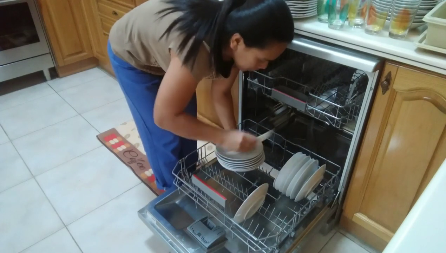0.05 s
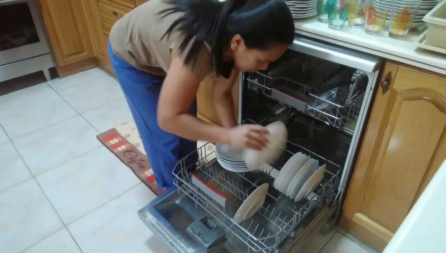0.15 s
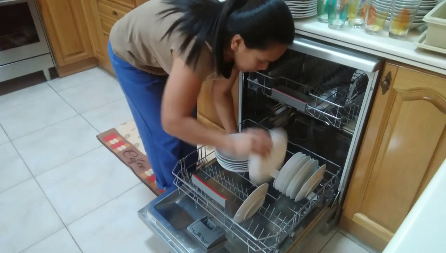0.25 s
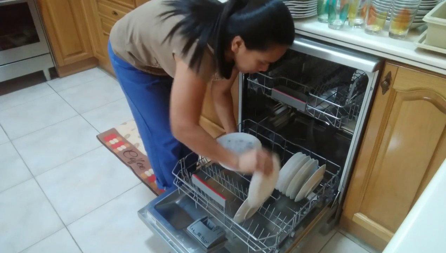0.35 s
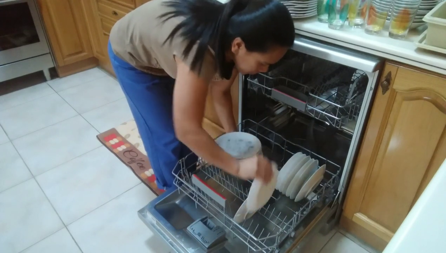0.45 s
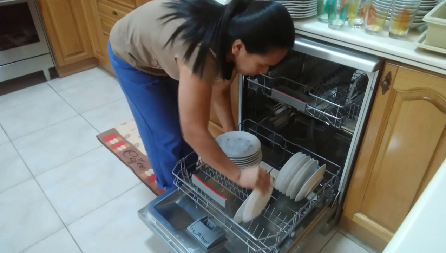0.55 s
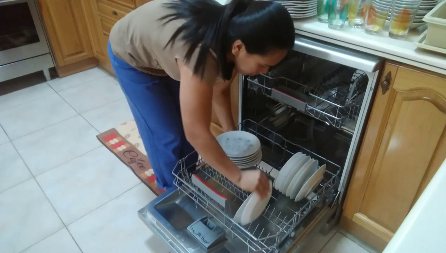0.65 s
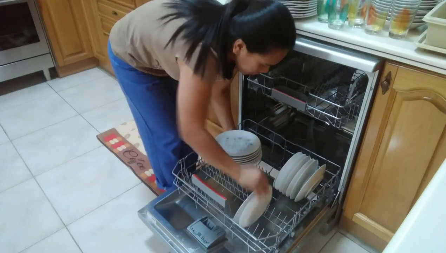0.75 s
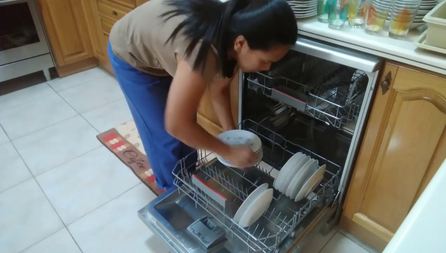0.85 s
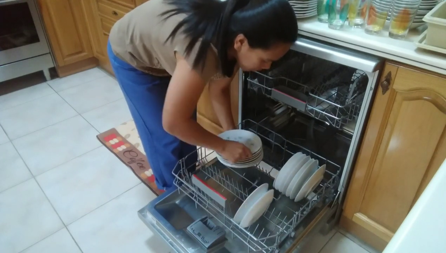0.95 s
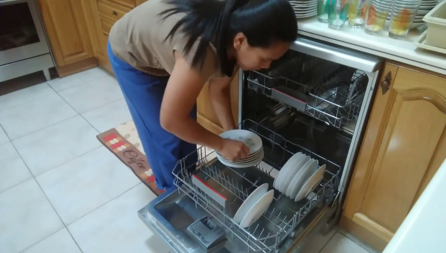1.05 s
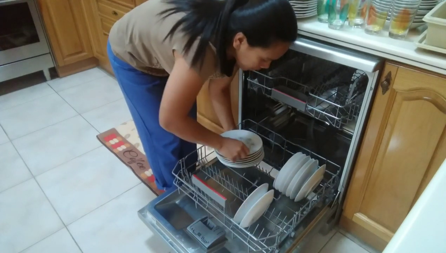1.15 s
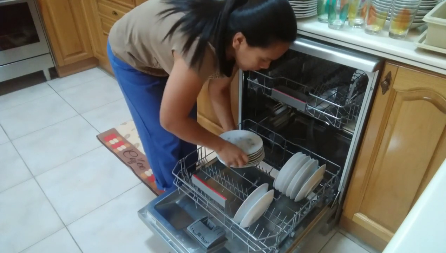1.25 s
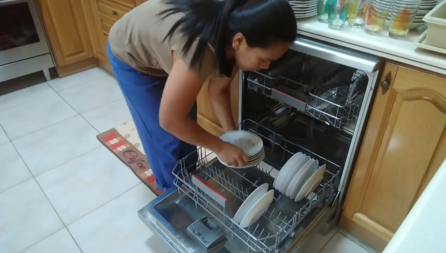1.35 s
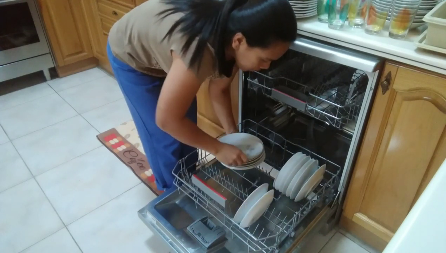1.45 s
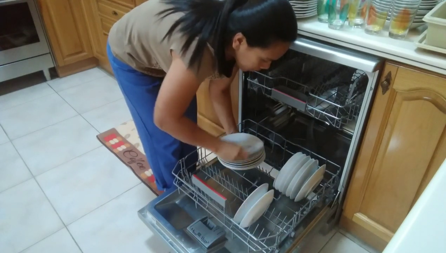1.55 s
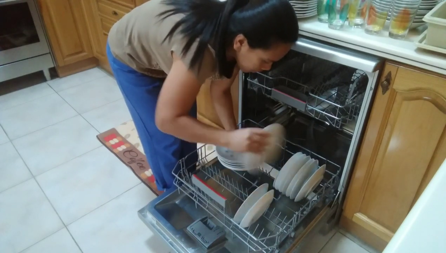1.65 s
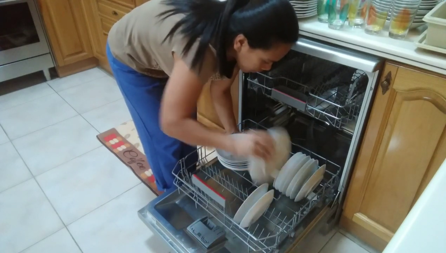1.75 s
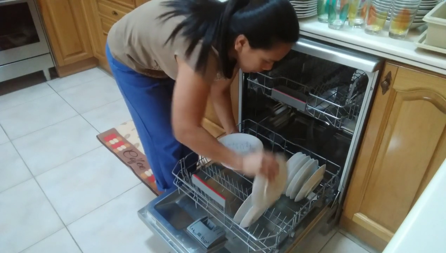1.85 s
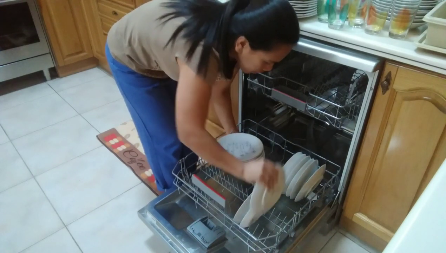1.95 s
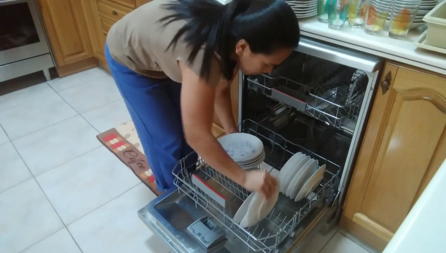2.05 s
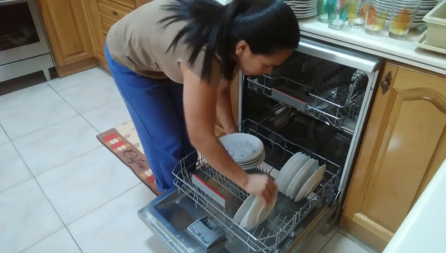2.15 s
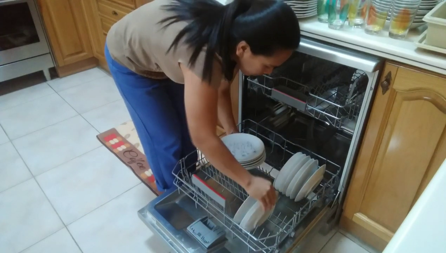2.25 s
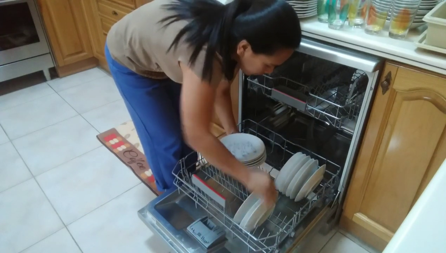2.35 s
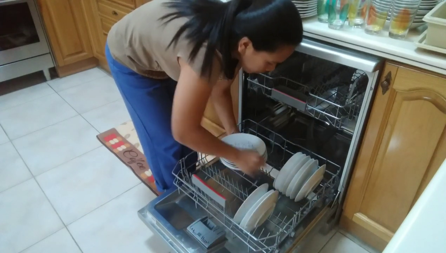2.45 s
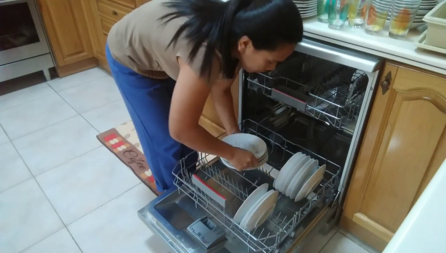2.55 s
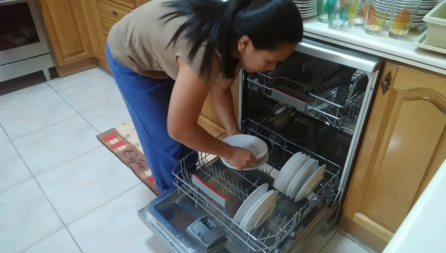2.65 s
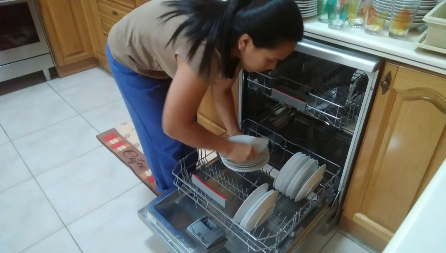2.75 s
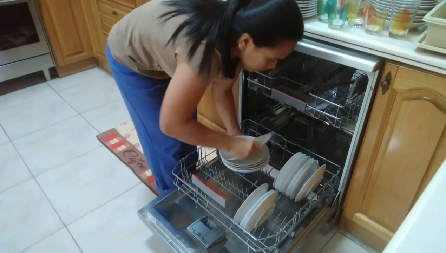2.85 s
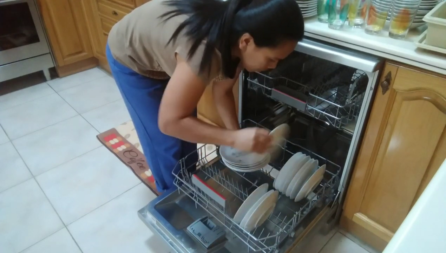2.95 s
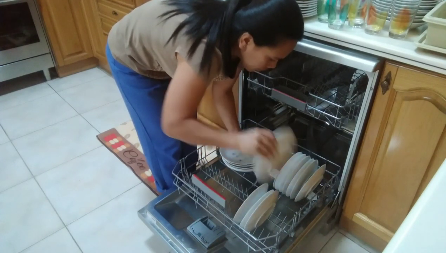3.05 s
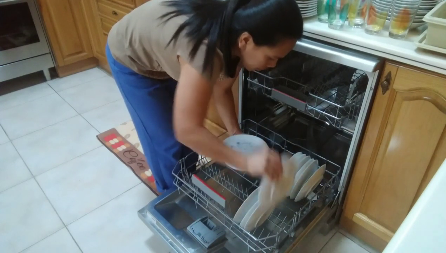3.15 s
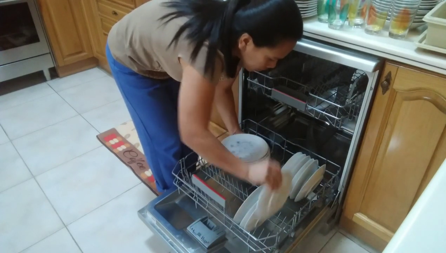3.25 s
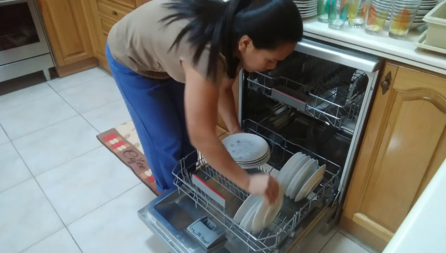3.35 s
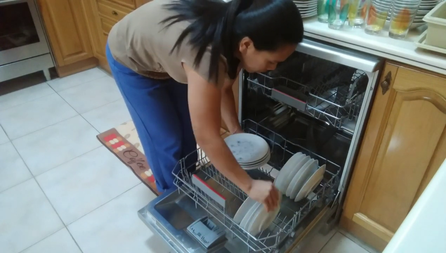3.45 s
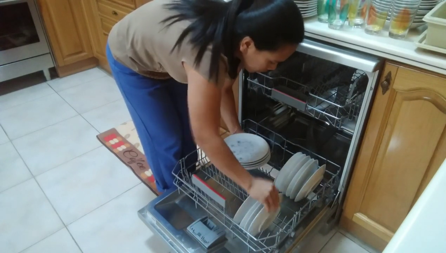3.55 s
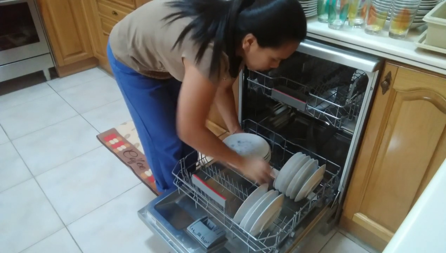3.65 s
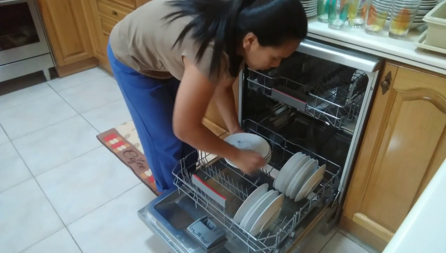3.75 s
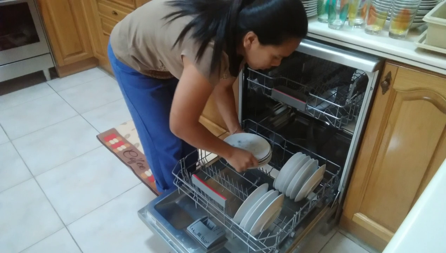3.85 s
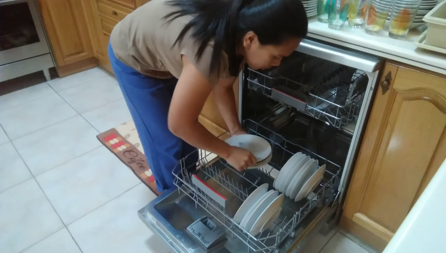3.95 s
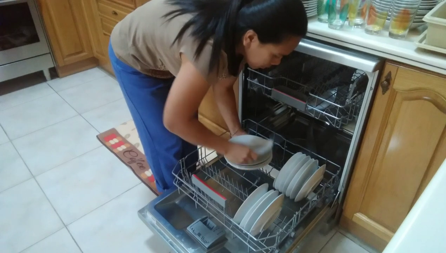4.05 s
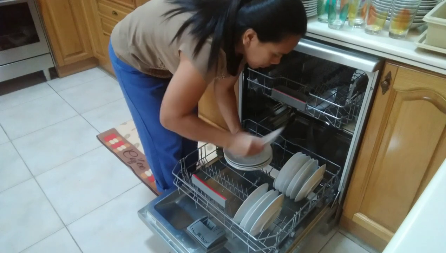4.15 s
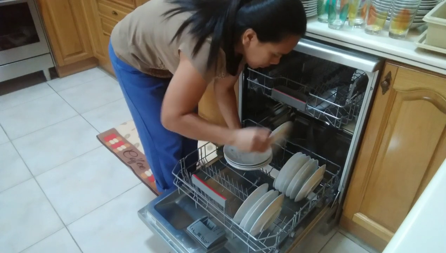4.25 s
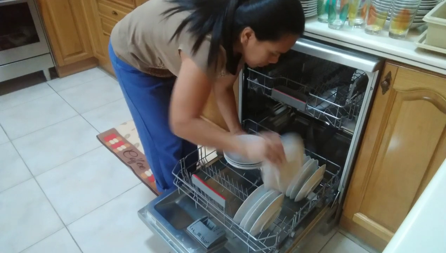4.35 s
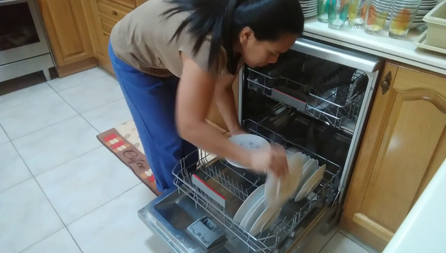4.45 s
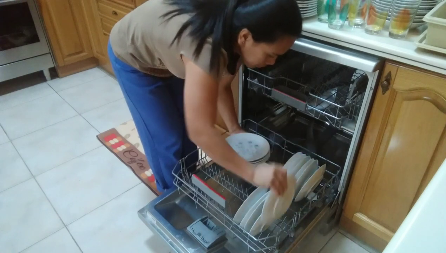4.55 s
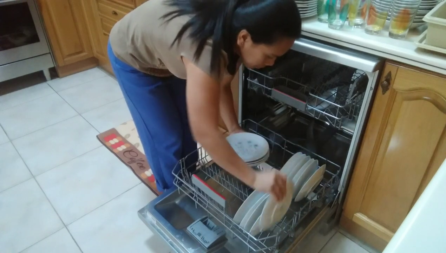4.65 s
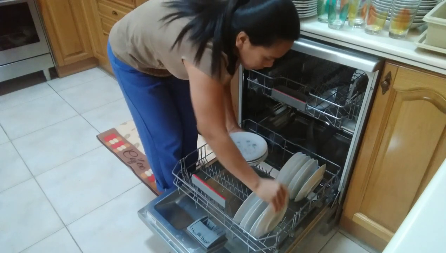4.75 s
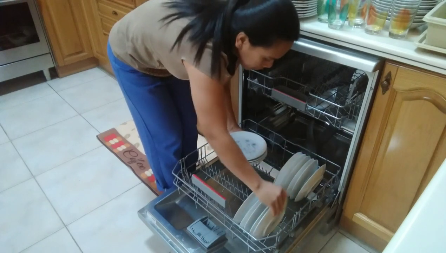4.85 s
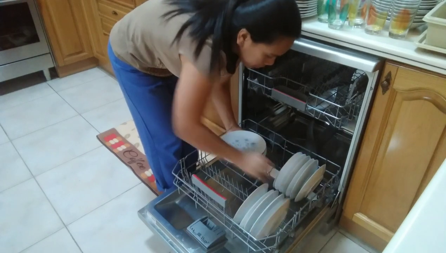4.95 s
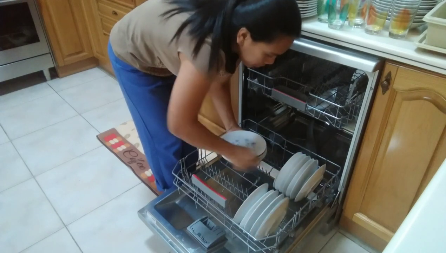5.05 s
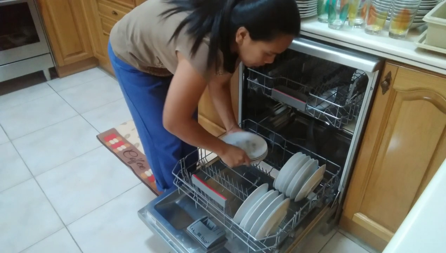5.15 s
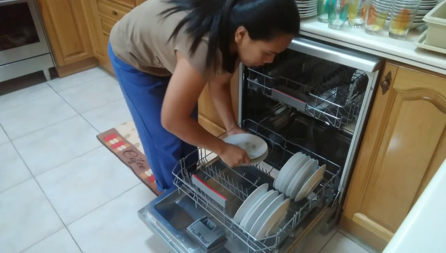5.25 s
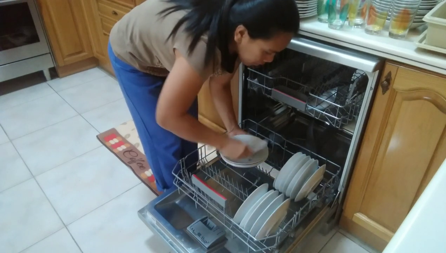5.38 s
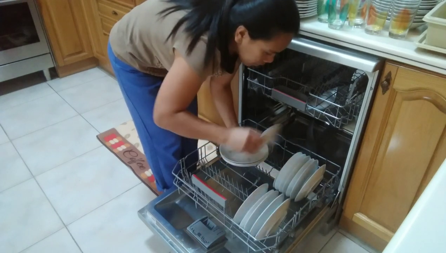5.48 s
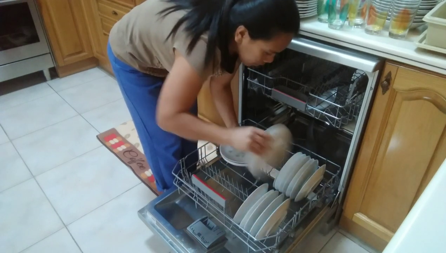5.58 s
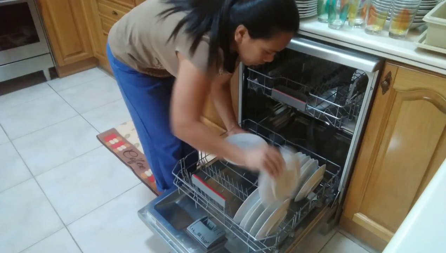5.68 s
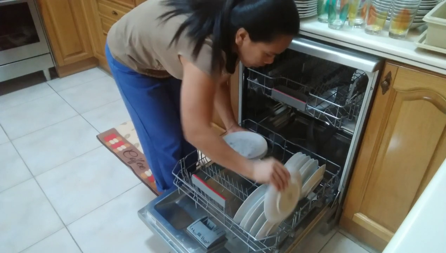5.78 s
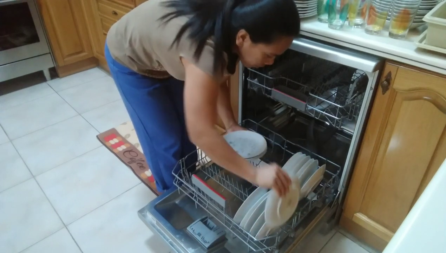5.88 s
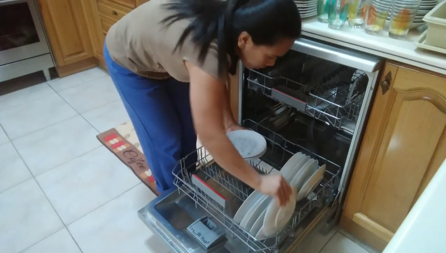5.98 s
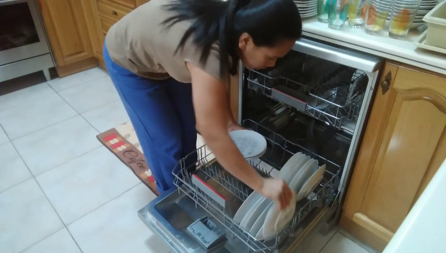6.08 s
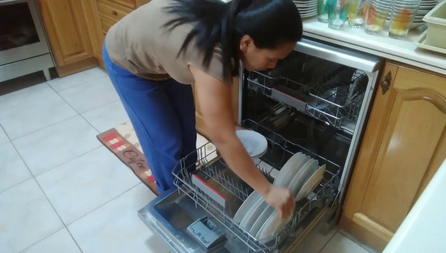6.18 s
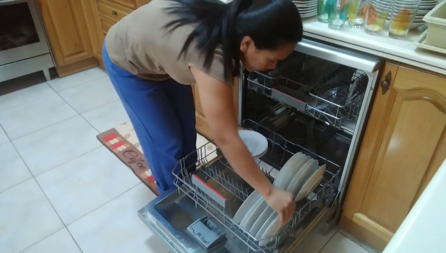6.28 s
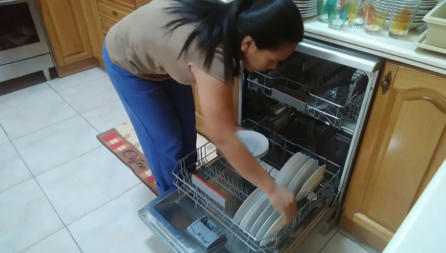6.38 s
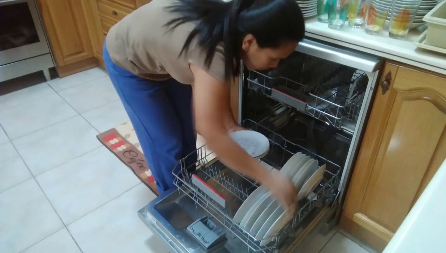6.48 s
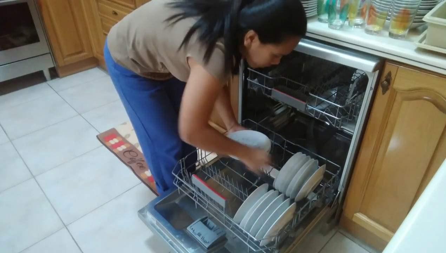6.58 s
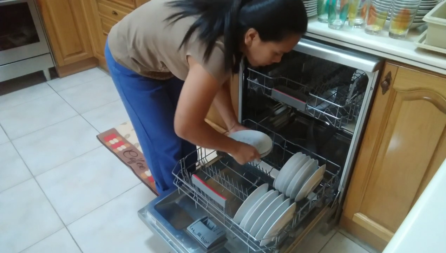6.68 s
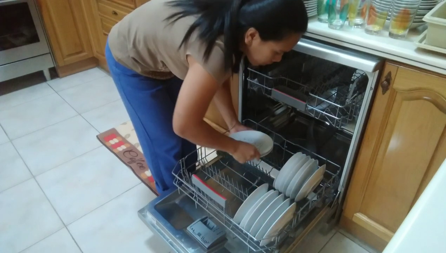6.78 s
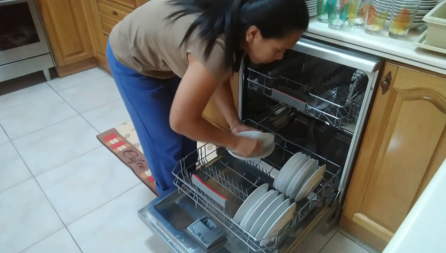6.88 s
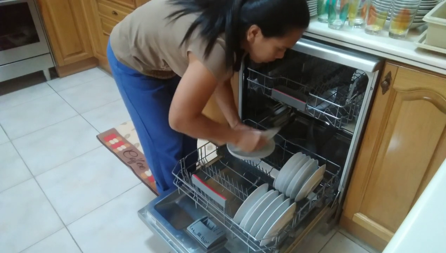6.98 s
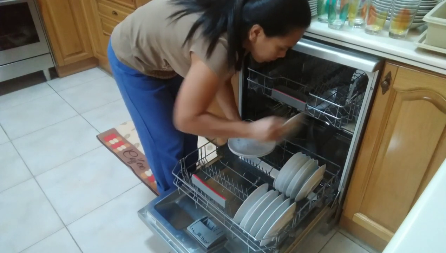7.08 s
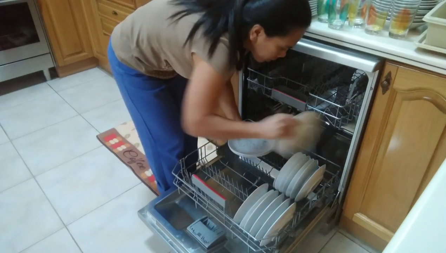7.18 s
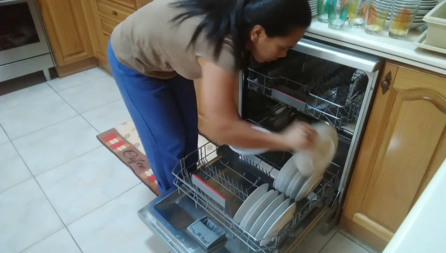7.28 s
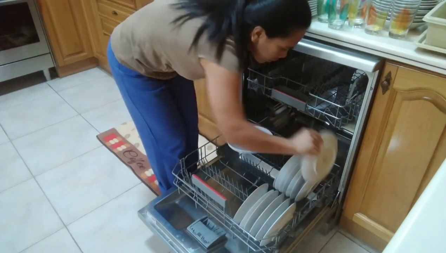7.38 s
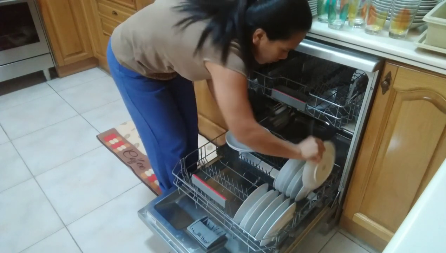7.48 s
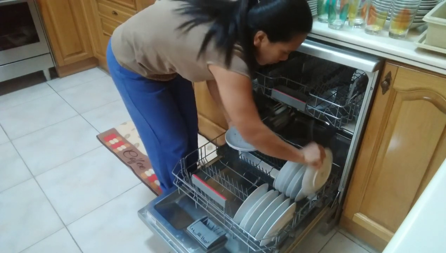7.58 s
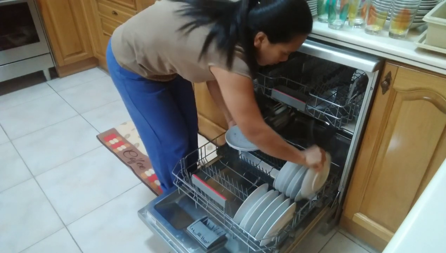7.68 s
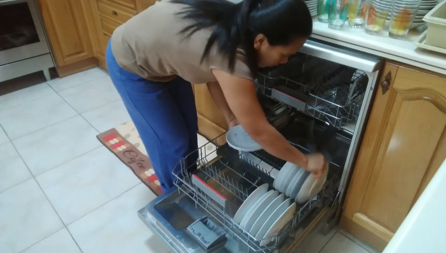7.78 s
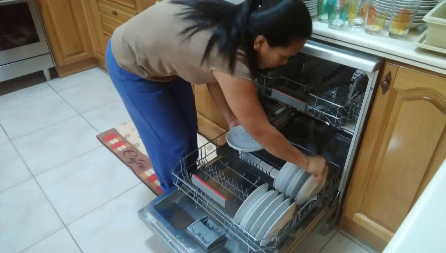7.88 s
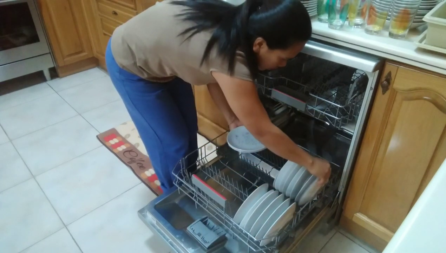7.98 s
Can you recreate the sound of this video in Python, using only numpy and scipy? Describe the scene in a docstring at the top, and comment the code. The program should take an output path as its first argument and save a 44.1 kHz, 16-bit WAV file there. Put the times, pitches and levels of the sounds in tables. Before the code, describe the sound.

Ceramic plates slid from a hand-held stack clack and knock one by one into a dishwasher's wire rack in a hard, tiled kitchen.

```python
"""Ceramic plates, slid off a hand-held stack, clack and knock as they are set into a dishwasher's wire rack.
Blows and grinding excite damped modes of each plate, stack or racked row; noise bursts give the cracks.
The same blows shake rack and door, and a hard tiled kitchen adds a diffuse noise tail to each.
A faint mains hum, a fading low tone and a steady hiss lie beneath. One microphone signal with gain
control feeds both channels, and patches of treble spread flickeringly between them."""
import sys
import numpy as np
from scipy import signal
from scipy.fft import rfft, irfft
from scipy.io import wavfile
from scipy.ndimage import uniform_filter1d

SR = 44100
rng = np.random.default_rng(int(sys.argv[2]) if len(sys.argv) > 2 else 0)


def magnitude_from_level(level_db):
    """Linear magnitude for a level in decibels (20 dB per decade)."""
    exponent = np.asarray(level_db, float) / 20
    return 10 ** exponent


def output_pcm(signal):
    """Save a mono or channel-first signal as 16-bit PCM at the path in sys.argv[1].

    Samples are clipped to [-1, 1] before scaling.
    """
    pcm = np.clip(np.atleast_2d(signal).T, -1, 1) * 32767
    wavfile.write(sys.argv[1], SR, np.round(pcm).astype(np.int16))


N = 353682
LEAD = SR // 2   # samples computed ahead of the audible start
LONG = N + LEAD

# Impacts. Each row: start in seconds, relative ring level in dB, relative rack thud in dB,
# brightness in dB per octave, favoured frequency in Hz.
BLOWS = [(0.2123, -57, -59.5, 0.8, 10100), (0.4753, -35.5, -58.5, 0.5, 2786),
         (0.555, -32.5, -52.5, -2, 6710), (0.6738, -18.5, -42, 0, 3550), (0.7428, -6.5, -27, 1.6, 1590),
         (0.7829, -4.5, -33, 3.5, 9460), (0.9201, -18, -30.5, 0.1, 6710), (1.0179, -29, -43, -2.5, 1620),
         (1.252, -29.5, -43, -4.5, 1064), (1.3113, -7, -62, 3.5, 5300), (1.3793, -15.5, -51, 3.5, 2710),
         (1.4467, -14.5, -60, 3.8, 13400), (1.49, -9.5, -51, 0.5, 11800), (2.1353, -21, -50, 2.5, 3500),
         (2.1647, -6, -35, 1.1, 9460), (2.2618, -4, -24.5, -1.5, 3295), (2.2984, -21.5, -46, -2, 5310),
         (2.59, -44.5, -42, -4.5, 2140), (2.7584, -4.5, -50.5, 3.5, 2044), (3.364, -21, -47.5, 6.5, 3700),
         (3.3843, -12, -35, 3, 5240), (3.4045, -12.5, -51, -0.5, 5300), (3.486, -8.5, -30.5, 4.5, 4430),
         (3.5881, -13, -28.5, 0.8, 6760), (3.853, -23, -65, 1.5, 11600), (3.8883, -17.5, -40, 1, 2090),
         (3.9394, -48, -50.5, -6.5, 2310), (4.0284, -10, -49, 0.5, 3560), (4.6791, -15, -42, -0.7, 1170),
         (4.72, -19.5, -42, -0.1, 3340), (4.8263, -28, -38.5, 0.5, 5170), (4.8881, -16, -29.5, -1, 2210),
         (4.9328, -9.5, -30, 4, 5230), (4.997, -8, -32, 1, 13100), (5.1303, -16, -59.5, 0.5, 5250),
         (5.1871, -11, -37.5, 1.5, 2290), (5.2698, -15, -56, 0.5, 9430), (5.3286, -8.5, -82.5, 0, 10600),
         (5.686, -8.5, -37.5, 1, 7700), (5.6889, -5.5, -39.5, 13.5, 9440), (5.7694, -7.5, -43, 4, 1580),
         (5.7994, -13, -38, 7, 8350), (6.1715, -20.5, -36.5, 12.5, 5250), (6.2294, -22.5, -48.5, 0.5, 2230),
         (6.254, -13, -28.5, 4, 2230), (6.2794, -27.5, -46, -2.5, 2130), (6.758, -13, -56, 2, 2240),
         (6.9016, -11.5, -53, 3.6, 2160), (7.6084, -23.5, -37.5, -1.8, 3590), (7.6342, -15, -31, 7.5, 3600),
         (7.697, -44, -67, -12.5, 3470), (7.7534, -13, -42, 5.5, 4770), (7.8515, -13.5, -36.5, 7, 10200),
         (7.9745, -27.5, -42.5, 0.5, 3630)]
# One impact before the start, of which only the tail is heard. Columns as in BLOWS.
EARLIER_BLOW = (-.17, -8, -50, .5, 1580)
# China grinding on china or wire. Each row: start in seconds, hardest moment in seconds,
# end in seconds, relative level at the hardest moment in dB.
SCRAPES = [(0.745, 0.912, 1.19, -21.5), (1.238, 1.463, 1.76, -21.5), (2.15, 2.324, 3.1, -45),
           (2.607, 2.675, 2.69, -25.5), (3.378, 3.55, 3.7, -27.5), (3.84, 4.035, 4.23, -24.5),
           (4.665, 5.098, 5.4, -32), (5.69, 5.72, 8.3, -49.5), (6.17, 6.205, 6.23, -33),
           (6.728, 6.72, 6.8, -31.5), (7.607, 7.638, 7.95, -42)]
# Modes of each plate, shorter stack or racked row. Each row: frequency in Hz,
# bandwidth in Hz before the partners' width factor, relative level in dB.
STACK_OF_8 = [(1580, 12, -2.5), (2310, 230, -7.5), (2720, 24, 3.5), (3590, 96, -6.5), (4400, 78, -22),
              (5450, 98, -14), (6500, 42, -20), (8430, 63, 0), (10100, 60, -22), (10700, 230, -2),
              (11600, 54, -5.5), (13100, 35, -15)]
PLATE_1 = [(1594, 9, 0.5), (2184, 33, -20.5), (2786, 49, -9), (3550, 100, -8), (4350, 70, -4.5),
           (5336, 53, -3.5), (6710, 73, -5), (7770, 190, -17), (8290, 57, -10.5), (9460, 19, -6),
           (10490, 33, -5.5), (10200, 51, -20), (10400, 22, -20.5), (11200, 29, -20), (12440, 24, -2),
           (11550, 40, -7), (13100, 20, -8), (14260, 51, -13), (15300, 33, -17)]
STACK_OF_7 = [(1100, 7.6, 3), (1270, 26, 0), (2210, 690, -2), (2710, 23, 5), (3845, 11.8, 12.5),
              (5250, 29, -0.5), (6050, 130, -6), (7940, 28, 6.5), (8660, 31, -6), (8600, 52, 0.5),
              (9770, 22, -26), (10300, 58, 5), (11600, 20, -1.5), (11800, 33, -1), (12400, 83, -3.5),
              (13100, 51, -9), (13400, 39, 0), (14050, 50.3, -22), (14550, 36, -17), (15340, 99, -3)]
PLATE_2 = [(1200, 15.7, -6.5), (2290, 13, 1.5), (2886, 9.9, 0.5), (3565, 123, -0.5), (4290, 63, -3.5),
           (5040, 34, -1), (5250, 100, -3), (6710, 92, -6), (7860, 16, 1.5), (8770, 16, 0), (9440, 18, -16),
           (9900, 33, -10.5), (9700, 150, -9.5), (10600, 27, 2.5), (11000, 25, -13), (11680, 33, -5.5),
           (11600, 55, -12), (12130, 27, -0.5), (13000, 120, -8), (13600, 23, -15.5), (14600, 79, -11),
           (15000, 34, -18.5)]
STACK_OF_6 = [(2186, 42, 1.5), (2490, 7.1, 4.5), (3410, 9, 7), (3870, 33, 2), (5120, 49, -5),
              (5440, 27, -2.5), (6750, 88, -10), (7870, 30, -2), (8760, 31, -19), (8480, 17, -0.5),
              (9180, 24, -18), (9750, 75, -29), (10200, 31, -6), (10600, 30, -13), (11270, 22, 1),
              (11700, 24, -14), (11800, 44, -14), (13450, 16, 0), (12760, 63, -10.5), (14100, 39, -12)]
PLATE_3 = [(1182, 23, -3), (2526, 58, 4), (3680, 220, -2.5), (4220, 34, -5.5), (4430, 72, -4.5),
           (5330, 80, 1.5), (6570, 66, -7.5), (6760, 36, -7), (7700, 84, -5), (8300, 65, -5.5),
           (8800, 41, -12), (8870, 53, -11), (10600, 490, -7.5), (11600, 34, -1), (12200, 47, -12.5),
           (12240, 44, -3.5), (12600, 52, -9), (13740, 140, -23), (14600, 21, -15.5), (14100, 56, -11.5),
           (14960, 45, -16), (15300, 35, -18)]
STACK_OF_5 = [(1169, 14, 2.5), (2097, 30, 2.5), (2290, 46, 4), (3560, 46, -3), (3950, 7.3, 9),
              (5240, 38, 5.5), (5300, 19, -20), (5900, 230, -5), (7690, 31, 4), (8100, 59, -14),
              (8350, 99, -23.5), (8550, 120, 0.5), (9430, 38, -1), (10570, 65, 4.5), (11600, 37, 6),
              (11600, 38, -1.5), (13700, 48, -0.5), (13000, 42, 8.5), (14100, 89, -10), (15300, 37, -11)]
PLATE_4 = [(1225, 51, -1.5), (2210, 39, -9.5), (3340, 40, -3), (3580, 96, 1.5), (5230, 120, -6),
           (6320, 29, -3), (4770, 22, 0), (7730, 25, 2), (8820, 56, -6), (9960, 52, 0), (10470, 130, -2.5),
           (10800, 35, -18), (11900, 39, -12), (11500, 39, -9), (12800, 38, -5), (13100, 27, -9),
           (13470, 170, -20), (14180, 31, -14), (14650, 47, -18.5), (15550, 110, -19)]
STACK_OF_4 = [(1054, 100, -8), (1750, 35, 0.5), (2250, 25.5, 3), (3710, 80, 3.5), (4000, 32, -15),
              (5250, 56, 0.5), (6450, 13, 6.5), (8020, 82, -6), (8680, 25, 11), (9430, 40, -9),
              (10600, 44, -9), (10600, 60, -5), (11600, 59, -11), (11600, 61, 3.5), (11800, 68, -9),
              (12700, 140, -0.5), (13700, 110, -6.5), (13800, 83, -5), (14640, 72, -20), (15400, 45, -8)]
PLATE_5 = [(1567, 6.2, -1.5), (2163, 75, -2), (2600, 53, -11), (3380, 24, 0), (3590, 34, 5.5),
           (4770, 50, -5), (5400, 62, -9.5), (6270, 52, -6), (6620, 79, -13), (7400, 32, -14.5),
           (7700, 33, -16.5), (8430, 76, -10), (9440, 9.7, -6), (10200, 53, -6.5), (11360, 22, -9.5),
           (11330, 50, -13.5), (12150, 23, -8), (13000, 47, -17), (13400, 47, -14.5), (13400, 12, -16),
           (14800, 26, -23.5)]
RACKED_ROW = [(1110, 68, -2), (2240, 18, -2), (2760, 42, -7.5), (3440, 21, 2.5), (3550, 49, 4.5),
              (4480, 100, -11.5), (5200, 140, -9.5), (6130, 72, -21), (7750, 86, -15), (8450, 33, -14.5),
              (9900, 27, -20), (10200, 43, -13), (10200, 19, -15), (11600, 63, -18)]
STACK_OF_3 = [(794, 38, 3.5), (2057, 96, 2.5), (3710, 71, 0), (5040, 38, -4), (5310, 18, -12.5),
              (5850, 150, -5.5), (5980, 30, -14), (7700, 37, -7.5), (8560, 69, -7), (8130, 39, -9),
              (9230, 32, -12), (11300, 100, -5.5), (10860, 37, -10), (11600, 28, -0.5), (13300, 27, -8),
              (13200, 25, -1), (13400, 34, -10.5), (14600, 32, -12)]
FAR_ROW = [(1150, 69, -0.5), (3440, 75, 8), (5030, 130, -14), (5040, 51, 0), (6390, 88, 1), (6630, 15, -14),
           (6800, 32, -0.5), (7600, 48, 2.5), (8370, 29, -20), (9430, 33, -24), (10200, 59, -11.5),
           (11000, 100, -15), (12800, 61, -10.5), (12400, 21, -8), (13800, 180, -12), (14500, 37, -19)]
PLATE_6 = [(1205, 78, 10), (2300, 16.8, 2), (3600, 170, 1.5), (4770, 97, -1), (5260, 18, 7.5),
           (6420, 44, 3.5), (6880, 22, -5.5), (7700, 48, -4.5), (8500, 27, -12), (8360, 47, -7),
           (9430, 74, -9), (10200, 38, -26.5), (10900, 60, -20), (13700, 29, -15.5)]
# What is in hand. Each row: handled from (seconds), modes of the body, whether plates rest on each other.
HANDLED = [(-.3, STACK_OF_8, True), (.42, PLATE_1, False), (1.22, STACK_OF_7, True), (2.1, PLATE_2, False),
           (2.55, STACK_OF_6, True), (3.33, PLATE_3, False), (3.82, STACK_OF_5, True),
           (4.65, PLATE_4, False), (5.175, STACK_OF_4, True), (5.66, PLATE_5, False),
           (6.15, RACKED_ROW, False), (6.57, STACK_OF_3, True), (7.55, PLATE_6, False),
           (7.84, FAR_ROW, False)]
# Partners of each mode; stacked plates differ and damp each other.
# Each row: pitch offset as a share of the frequency, relative level in dB, width factor.
ONE_PLATE = [(0, -1, 0.81), (.005, -11.5, 2.07)]
STACKED = [(-.025, -11.5, 5.1), (0, -8.5, 5.2), (0.021, -14, 3.9), (0.001, -1.5, 0.9)]
# Modes of wire rack and door. Each row: frequency in Hz, bandwidth in Hz, relative level in dB.
RACK = [(109, 26, 12), (226, 114, 10), (734, 41, -2)]
# Spectrum of the unpitched part of a contact. Each row: frequency in Hz, relative density in dB per Hz.
CRACK = [(180, -24.5), (300, -23.5), (1040, 5.5), (1870, -1.5), (2100, 7), (4750, -7), (6620, 0),
         (7320, -14), (10600, -3.5), (16000, -23.5)]
# Mains lines. Each row: frequency in Hz, relative rms level in dB.
HUM = [(199.2, -62.5), (296.1, -69), (398.4, -61.5), (899.0, -66)]
# A low tone that dies away. Each row: time in seconds, relative rms level in dB.
DRONE = [(0, -59), (3.1, -57), (3.598, -64.5), (7.999, -70)]
# Spectrum of the hiss. Each row: frequency in Hz, relative density in dB per Hz.
AIR = [(24, -68), (45, -46.5), (95, -30.5), (147, -16), (189, -1), (337, -3.5), (402, -3), (570, -2.5),
       (1210, -4), (1900, -10), (2050, -9.5), (5870, -22.5), (11800, -20), (16000, -25)]
# Reverberation. Each row: frequency in Hz, time to fall 60 dB in seconds.
KITCHEN = [(150, 0.73), (500, 0.67), (2000, 0.71), (5000, 0.63), (10000, 0.41), (16000, 0.28)]
# Treble that spreads. Each row: frequency in Hz, share of the time from 0 to 1.
WIDE_SHARE = [(4100, .35), (5700, .4), (7500, .55), (9600, .45), (11000, .35), (13500, .8), (16000, .45)]

DRONE_HZ, AIR_DB = 268, -55
ROOM_DB = 5.5   # energy of the kitchen's impulse response
CONTACT_S = 0.0029   # time for the force of a contact to reach its peak
# crack beside the ring for a blow of middling strength, and how it falls behind as blows get harder
CRACK_STACKED_DB, CRACK_ONE_PLATE_DB, MIDDLING_BLOW_DB, CRACK_LAG_DB_PER_DB = -5, -16, -13, 0.34
SCRAPE_SWELL_DB, SCRAPE_FADE_DB = 15.5, 35.5
# gain control: threshold, dB of ducking per dB above it, smoothing time, fall of the held level
SQUEEZE_FROM_DB, SQUEEZE, DUCK_SMOOTHING_S, HELD_FALL_DB_PER_S = -11.5, 0.6, 0.0019, 18.5


def rms_one(x):
    """Normalization: scale to a root mean square of 1."""
    return x / np.sqrt(np.mean(x ** 2) + 1e-20)


def at_hz(points, hz):
    """Linear interpolation of a table on a logarithmic frequency axis."""
    table = np.array(points)
    return np.interp(np.log(np.maximum(hz, 1)), np.log(table[:, 0]), table[:, 1])


def coloured(x, spectrum):
    """Minimum-phase filtering: the folded cepstrum gives a causal pulse, here of unit energy."""
    cepstrum = irfft(np.log(magnitude_from_level(at_hz(spectrum, np.fft.rfftfreq(4096, 1 / SR)))))
    cepstrum[1:2048] *= 2
    cepstrum[2049:] = 0
    pulse = irfft(np.exp(rfft(cepstrum)))
    return signal.fftconvolve(x, pulse / np.linalg.norm(pulse))[:len(x)]


def resonance(x, hz, width_hz):
    """Damped resonance: a two-pole filter with gain 1 at its peak, whose bandwidth sets the decay."""
    r = np.exp(-np.pi * max(width_hz, 2) / SR)
    poles = [1, -2 * r * np.cos(2 * np.pi * hz / SR), r * r]
    return signal.lfilter([(1 - r * r) / 2, 0, (r * r - 1) / 2], poles, x + 1e-18)


def ring_energy_db(modes):
    """Additivity of modal energy: what a unit click leaves in a set of modes."""
    return 10 * np.log10(sum(magnitude_from_level(2 * db) * np.pi * width / SR for hz, width, db in modes))


def hum_and_air():
    """Superposition: sines for wavering mains lines and a fading low tone, filtered noise for hiss."""
    s = np.arange(-LEAD, N) / SR
    waver = rms_one(resonance(rng.standard_normal(LONG), 2.0, 5.1))
    hum = sum(magnitude_from_level(db) * np.sin(2 * np.pi * (hz * s + rng.random())) for hz, db in HUM)
    when, drone_db = np.transpose(DRONE)
    hum += magnitude_from_level(np.interp(s, when, drone_db)) * np.sin(2 * np.pi * DRONE_HZ * s)
    hiss = magnitude_from_level(AIR_DB) * coloured(rng.standard_normal(LONG), AIR)
    return np.sqrt(2) * hum * magnitude_from_level(1.7 * waver) + hiss


def contact(at, sizes, size):
    """Finite contact time: the force of each blow swells within a few ms and dies."""
    s = np.arange(SR // 30) / SR / CONTACT_S
    burst = s * np.exp(-s)
    force = np.zeros(size)
    force[at] = sizes
    return signal.fftconvolve(force, burst / np.linalg.norm(burst))[:size]


def china(blows, grind, chatter):
    """Modal excitation: blows and grinding drive the modes of the body in hand, with noise for cracks."""
    out = np.zeros(LONG)
    at = np.round(blows[:, 0] * SR).astype(int) + LEAD
    spread = rng.standard_normal((len(blows), 40))   # every blow lands elsewhere on the rim
    # the contact rolls on, modes catch one by one within 5 ms
    late = (rng.random((len(blows), 40)) * .005 * SR).astype(int)
    starts = [round(row[0] * SR) + LEAD for row in HANDLED] + [LONG]
    crack_db = -CRACK_LAG_DB_PER_DB * (blows[:, 1] - MIDDLING_BLOW_DB)
    for (_, body, stacked), start, end in zip(HANDLED, starts, starts[1:]):
        mine = (at >= start) & (at < end)
        stop = min(end + LEAD, LONG)   # room to ring on
        crack_db[mine] += CRACK_STACKED_DB if stacked else CRACK_ONE_PLATE_DB
        sliding = grind[start:stop] * (np.arange(start, stop) < end)
        ring_db, brightness, favoured_hz = blows[mine][:, [1, 3, 4]].T
        for k, (hz, width_hz, db) in enumerate(body):
            favour_db = 11 * np.exp(-(np.log2(hz / favoured_hz) / 0.063) ** 2)
            tilt_db = brightness * np.log2(hz / 4000)
            blow_db = ring_db + 11 + tilt_db + favour_db + 2.87 * spread[mine, k]
            force = sliding.copy()
            force[at[mine] - start + late[mine, k]] += magnitude_from_level(blow_db)
            for offset, partner_db, wider in STACKED if stacked else ONE_PLATE:
                gain = magnitude_from_level(db + partner_db - ring_energy_db(body))
                out[start:stop] += gain * resonance(force, hz * (1 + offset), width_hz * wider)
    # a brighter blow shifts the crack upward
    for side, kind in ((-1.1, "low"), (0.48, "high")):
        force_db = blows[:, 1] + crack_db + 23.0 + 0.83 * side * blows[:, 3]
        cracks = contact(at, magnitude_from_level(force_db), size=LONG) * chatter
        half = signal.butter(2, 3500, kind, fs=SR, output="sos")
        out += coloured(signal.sosfilt(half, cracks + magnitude_from_level(-2) * grind), CRACK)
    return out


def rack(blows):
    """Forced vibration: the same blows shake the wire rack and the door under it."""
    pushes = np.zeros(LONG)
    at = np.round(blows[:, 0] * SR).astype(int) + LEAD
    pushes[at] = magnitude_from_level(blows[:, 2] + 23 - ring_energy_db(RACK))
    shaking = np.exp(-np.arange(SR // 5) / (0.018 * SR))
    envelope = signal.fftconvolve(pushes, shaking / np.linalg.norm(shaking))[:LONG]
    force = envelope * rng.standard_normal(LONG)
    modes = sum(magnitude_from_level(db) * resonance(force, hz, width_hz) for hz, width_hz, db in RACK)
    return modes + magnitude_from_level(3.0) * resonance(force, 400, 530)


def kitchen(x):
    """Diffuse reverberation: half-octave noise bands, each dying at its own rate after a quick build-up."""
    s, tail = np.arange(SR + LEAD) / SR, 0
    edges = 90 * 2 ** np.arange(0, 7.8, .5)
    white = rng.standard_normal((2, len(s)))   # alternate bands draw on separate noises
    for k, (low, high) in enumerate(zip(edges, edges[1:])):
        band_pass = signal.butter(2, [low, high], "band", fs=SR, output="sos")
        band = signal.sosfilt(band_pass, white[k % 2])
        tail = tail + band * magnitude_from_level(-60 * s / at_hz(KITCHEN, np.sqrt(low * high)))
    tail = tail * (1 - np.exp(-s / 0.00067))
    return signal.fftconvolve(x, magnitude_from_level(ROOM_DB) * tail / np.linalg.norm(tail))[:LONG]


def grinding():
    """Sliding friction: dense uneven clicks while surfaces rub, about 600 per second."""
    s, level = np.arange(-LEAD, N) / SR, np.zeros(LONG)
    for start, hardest, end, db in SCRAPES:
        course_db = [db - SCRAPE_SWELL_DB, db, db - SCRAPE_FADE_DB]
        level += (s >= start) * (s < end) * magnitude_from_level(np.interp(s, [start, hardest, end], course_db))
    click_size = magnitude_from_level(6.3 * np.minimum(rng.exponential(1, LONG), 3))
    grit = (rng.random(LONG) < 600 / SR) * click_size * rng.choice([-1, 1], LONG)
    return magnitude_from_level(-15.0) * level * rms_one(grit)


def flickering_width(x, level_db):
    """Decorrelation: random-phase noise at each treble band's unpitched level comes and goes in patches."""
    hz, s, cells = signal.stft(x, SR, nperseg=1024)
    side, edges = np.zeros_like(cells), np.geomspace(4100, 16500, 15)
    for low, high in zip(edges, edges[1:]):
        band = (hz >= low) & (hz < high)
        slow = uniform_filter1d(rng.standard_normal(len(s)), size=9)
        share = np.clip(at_hz(WIDE_SHARE, np.sqrt(low * high)), 0, 1)
        wide = slow < np.quantile(slow, share)
        # the geometric mean over a band plays down its pitched peaks
        unpitched = np.exp(np.log(np.abs(cells[band]) + 1e-12).mean(axis=0))
        side[band] = wide * unpitched * np.exp(2j * np.pi * rng.random((band.sum(), len(s))))
    return magnitude_from_level(level_db) * signal.istft(side, SR)[1][:N]


def scene():
    """Superposition of all sources at one microphone, fed to both channels."""
    blows = np.array([EARLIER_BLOW, *BLOWS])
    struck = china(blows, grinding(), rng.standard_normal(LONG)) + rack(blows)
    # small objects radiate little bass
    high_pass = signal.butter(6, 175, "high", fs=SR, output="sos")
    struck = signal.sosfilt(high_pass, struck) + magnitude_from_level(-27.5) * struck
    sound = struck + kitchen(struck) + hum_and_air()
    return np.tile(sound[LEAD:], (2, 1))


def low_pass(x):
    """Removes everything above the highest recorded frequency."""
    return signal.sosfilt(signal.butter(12, 16650, fs=SR, output="sos"), x)


def record(dry):
    """Dynamic compression: loud passages are ducked with steady recovery, then a soft ceiling and top cut."""
    level_db = 10 * np.log10(uniform_filter1d(dry[0] ** 2, size=128) + 1e-12)
    ramp = HELD_FALL_DB_PER_S * np.arange(N) / SR
    held_db = np.maximum.accumulate(level_db + ramp) - ramp
    excess_db = np.maximum(held_db - SQUEEZE_FROM_DB, 0)
    r = np.exp(-1 / (DUCK_SMOOTHING_S * SR))
    duck_db = signal.lfilter([1 - r], [1, -r], SQUEEZE * excess_db)
    x = 0.83 * np.tanh(dry * magnitude_from_level(-duck_db) / 0.99)
    x = signal.sosfilt(signal.cheby2(10, 40, 16300, fs=SR, output="sos"), x)
    # opposite signs in the two channels
    mix = x + flickering_width(x[0], level_db=-7.0) * [[1], [-1]]
    return low_pass(mix)


dry = scene()
out = record(dry)
output_pcm(out)
```